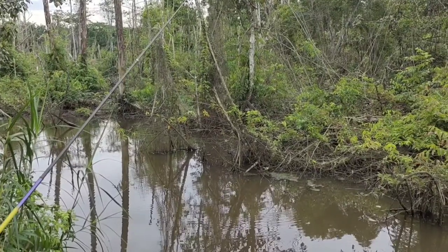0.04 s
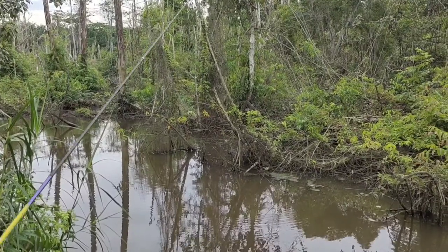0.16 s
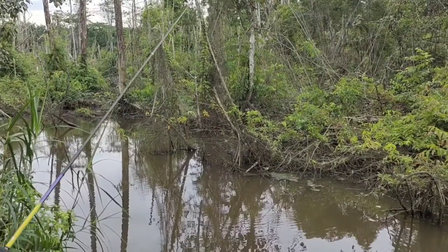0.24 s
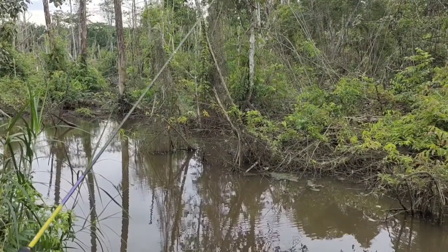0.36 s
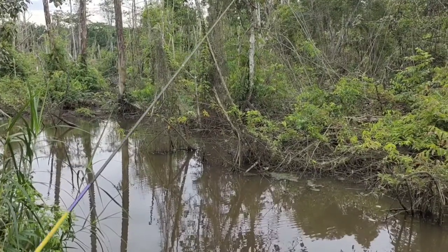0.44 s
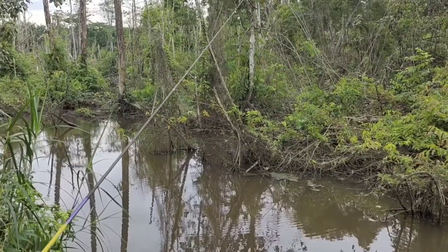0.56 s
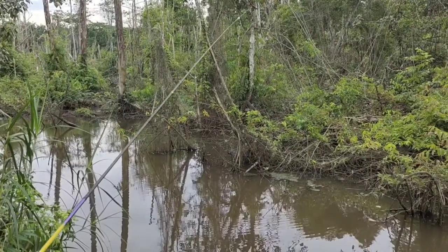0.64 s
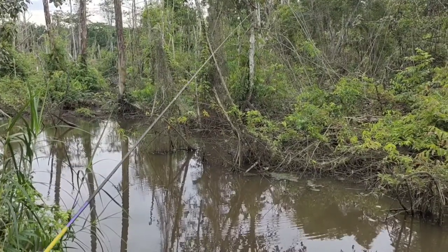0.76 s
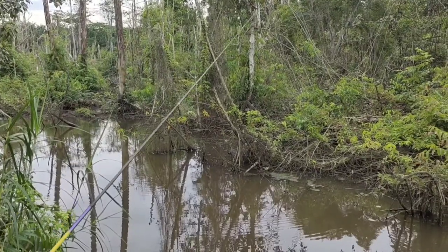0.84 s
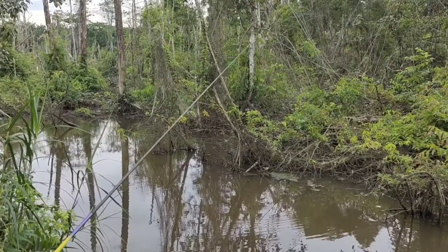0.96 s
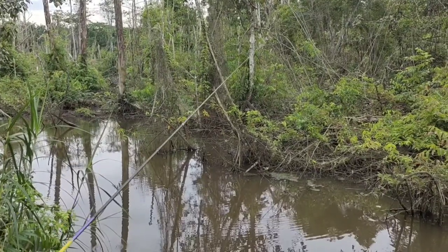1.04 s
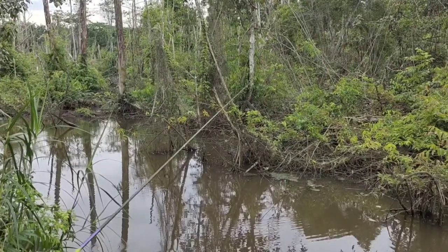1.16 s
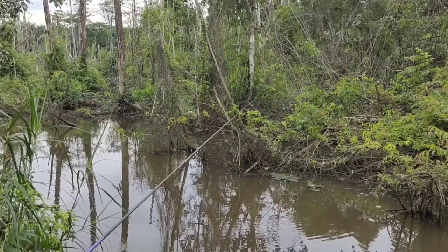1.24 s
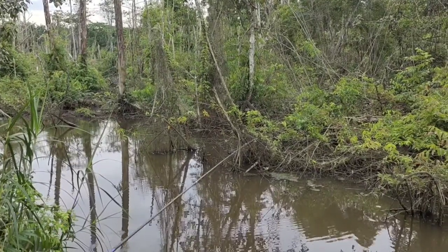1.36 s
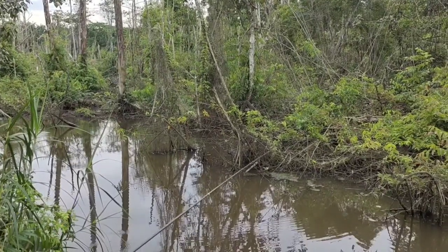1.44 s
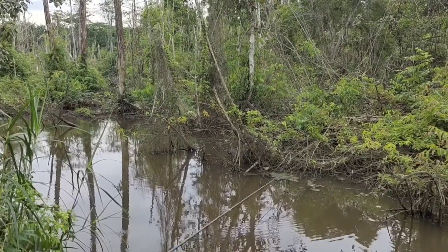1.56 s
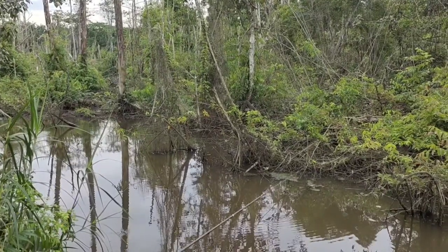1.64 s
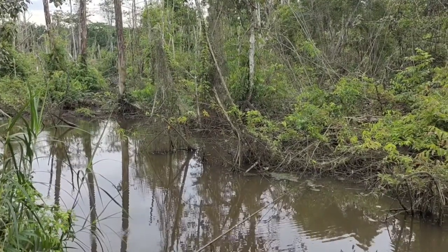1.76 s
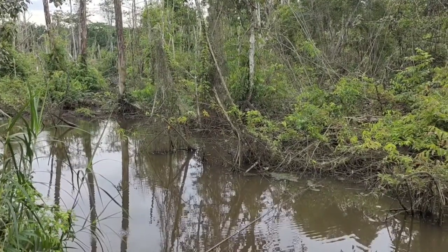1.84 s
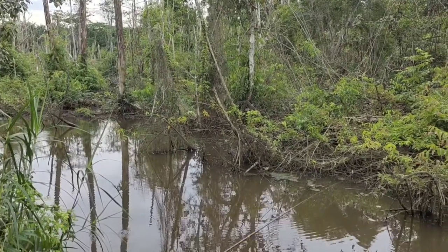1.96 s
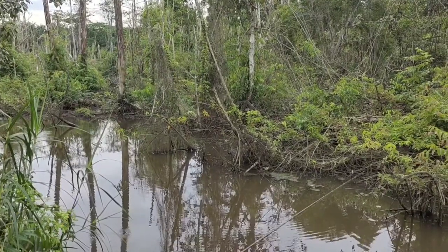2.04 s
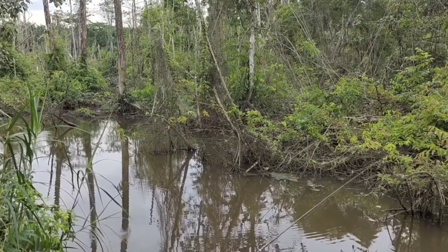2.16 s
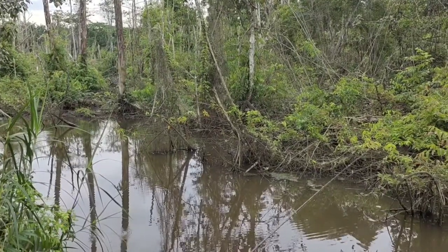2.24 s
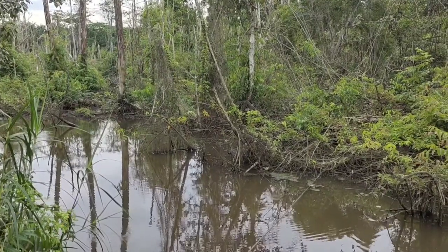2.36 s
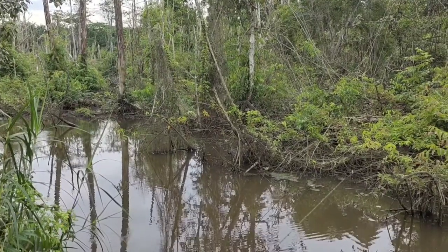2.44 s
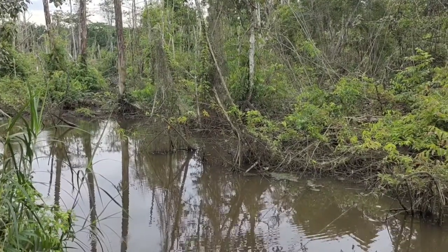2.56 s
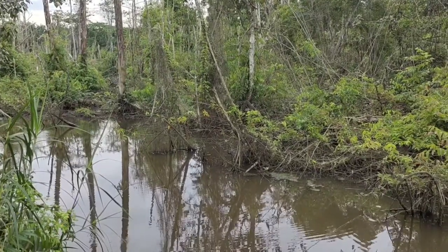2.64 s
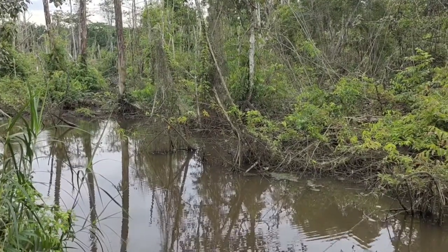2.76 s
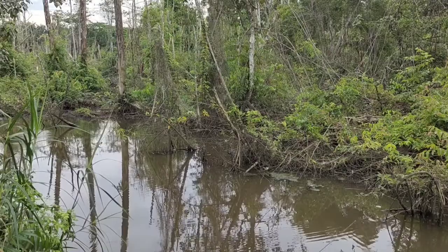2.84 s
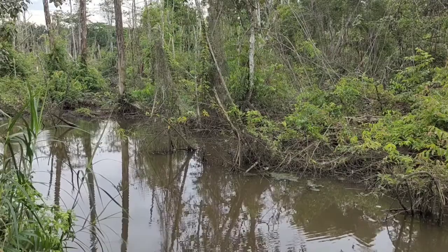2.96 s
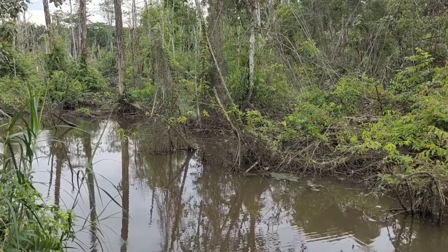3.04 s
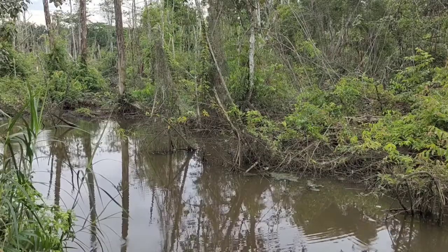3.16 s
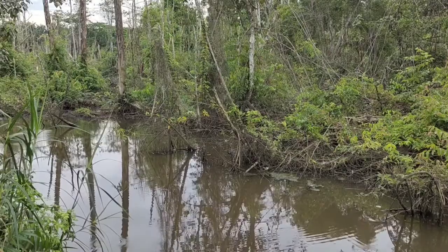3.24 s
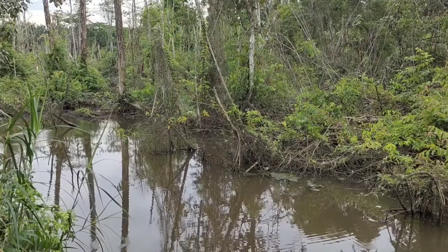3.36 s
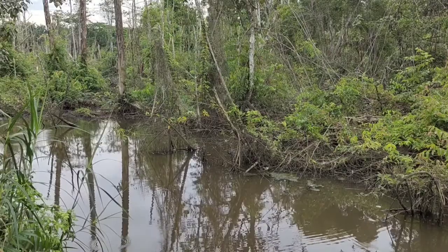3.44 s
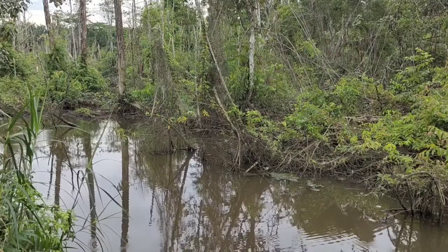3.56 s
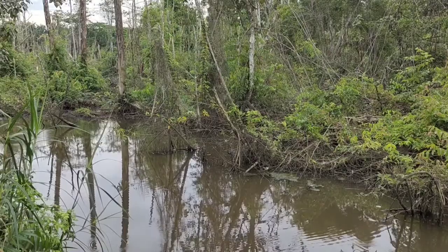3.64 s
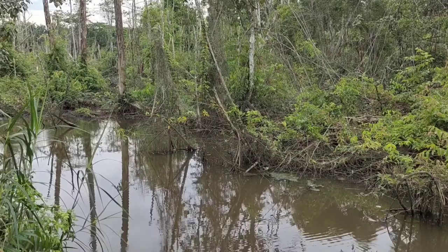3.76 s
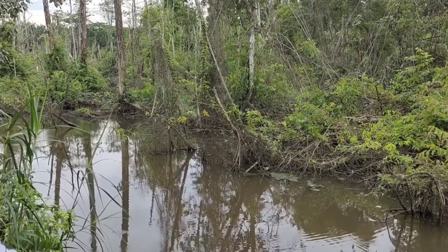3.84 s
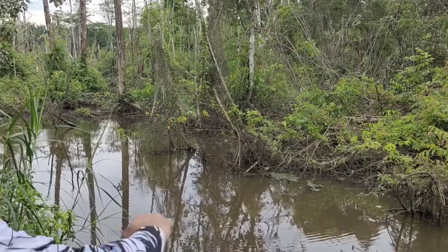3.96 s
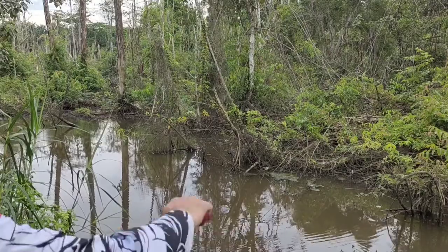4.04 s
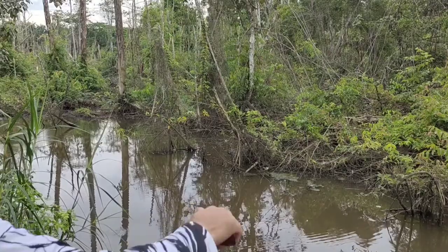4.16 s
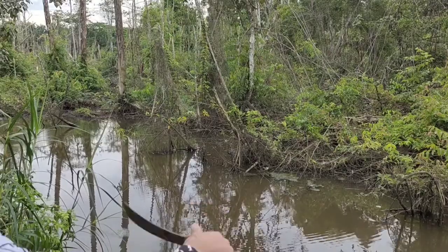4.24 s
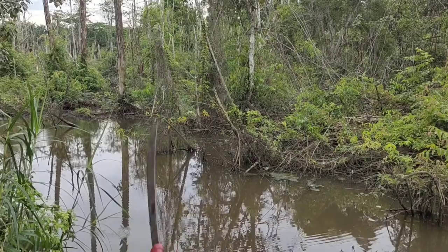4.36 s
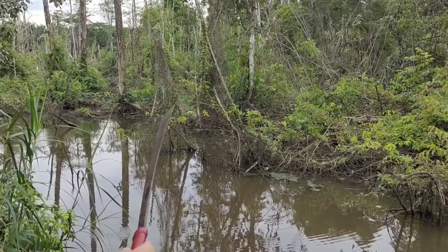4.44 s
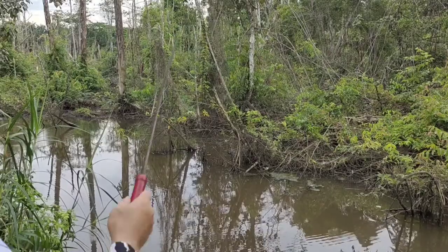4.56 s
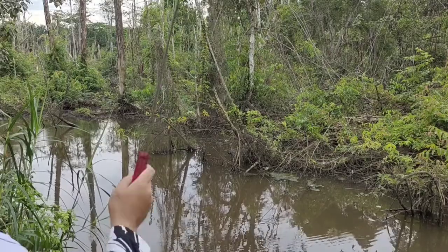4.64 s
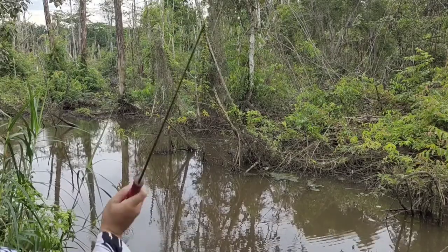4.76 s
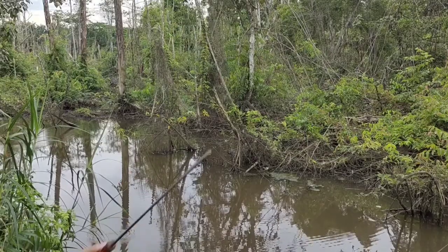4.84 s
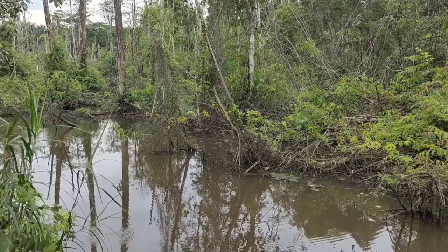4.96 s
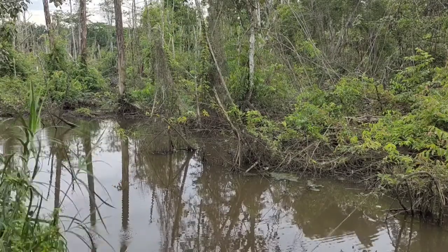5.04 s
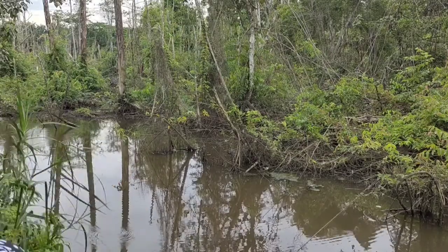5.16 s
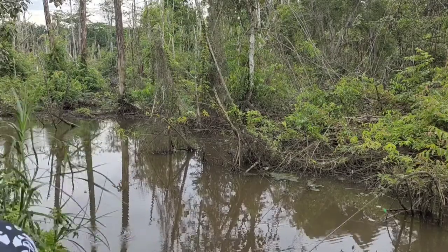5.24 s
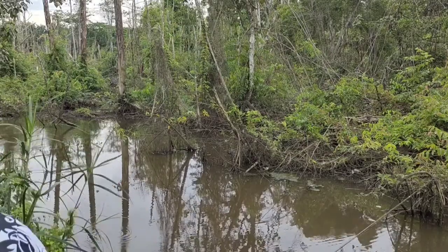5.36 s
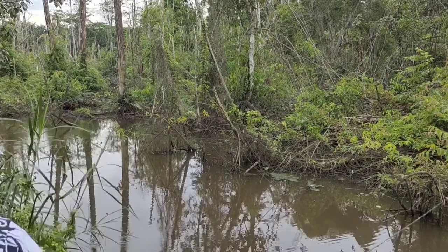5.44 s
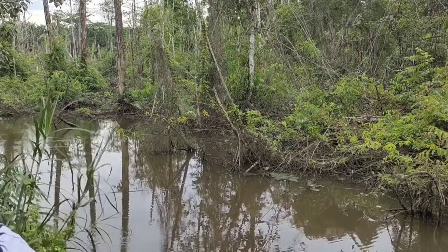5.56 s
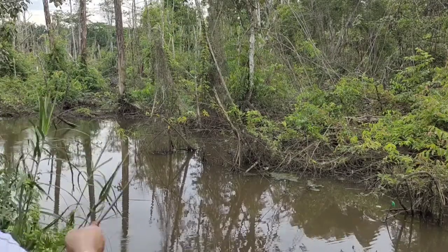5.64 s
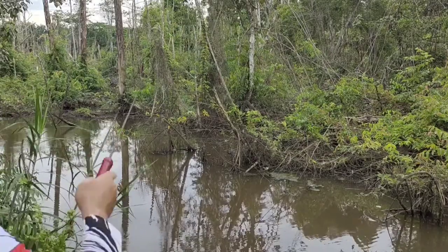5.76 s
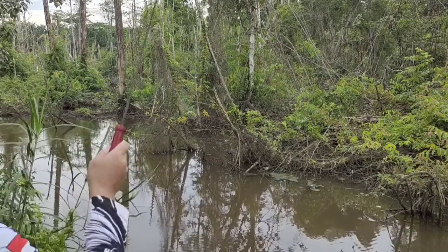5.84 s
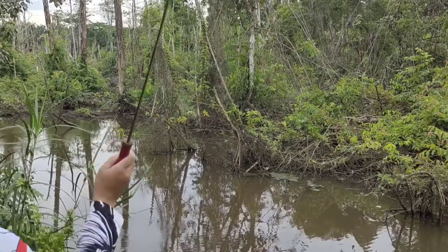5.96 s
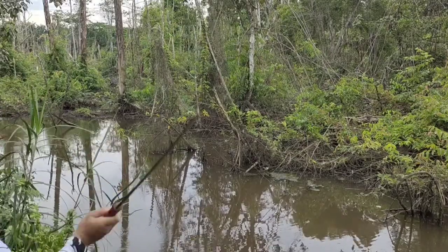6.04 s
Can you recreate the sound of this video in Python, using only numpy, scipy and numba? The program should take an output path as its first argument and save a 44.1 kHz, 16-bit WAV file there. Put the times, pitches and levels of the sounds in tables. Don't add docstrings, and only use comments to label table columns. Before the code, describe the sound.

Daytime swamp insects shrill thinly while clothes and reeds rustle close by; a blade suddenly rips through leaves with a sharp crack, then one hard knock.

```python
import sys
import numpy as np
from scipy import signal
from scipy.fft import rfft, irfft
from scipy.io import wavfile
from scipy.ndimage import uniform_filter1d
from numba import njit

SR = 44100
rng = np.random.default_rng(int(sys.argv[2]) if len(sys.argv) > 2 else 0)


def master_out(mix):
    frames = np.transpose(np.atleast_2d(mix))
    ceiling = np.clip(frames, -1, 1)
    pcm = np.round(ceiling * 32767).astype(np.int16)
    wavfile.write(sys.argv[1], SR, pcm)


def ratio(d):
    e = np.asarray(d, float) / 20
    return 10 ** e


N = 268833
T = np.arange(N) / SR
PORT_LAG = 16.0
BLOCK = 4096


def curve(table):
    s, *columns = np.transpose(table)
    return [np.interp(T, s, column) for column in columns]


def unit(x):
    return x / np.sqrt(np.mean(x ** 2))


@njit
def svf(x, hz, width):
    y, b, l = np.empty(len(x)), 0., 0.
    g, k = np.tan(np.pi * hz / SR), width / hz
    for i in range(len(x)):
        v = (b + g * (x[i] - l)) / (1 + g * (g + k))
        b, l, y[i] = 2 * v - b, l + 2 * g * v, k * v
    return y


def band(x, hz, width):
    return np.array([svf(channel + 1e-18, 1. * hz, 1. * width) for channel in x])


def colour(x, table, size=2048):
    hz, db = np.transpose(table)
    bins_hz = np.arange(size // 2 + 1) * SR / size
    log_gain = np.interp(np.log(bins_hz + 1), np.log(hz), db) * np.log(10) / 20
    cepstrum = irfft(log_gain)
    cepstrum[1:size // 2] *= 2
    cepstrum[size // 2 + 1:] = 0
    impulse = irfft(np.exp(rfft(cepstrum)))
    return signal.oaconvolve(x, impulse[None], axes=1)[:, :N]


def walk(rate):
    step = 32
    k = max(int(SR / step / rate), 1)
    held = np.repeat(rng.standard_normal(N // step // k + 2), k)
    slewed = uniform_filter1d(uniform_filter1d(held, k), k)
    return 1.3 * np.interp(T, np.arange(len(slewed)) * step / SR, slewed)


def ports(x, lag, pan_db):
    return np.array([np.roll(x, int(lag)), x]) * ratio(np.array([[pan_db], [-pan_db]]) / 2)


def grains(count, spread_db, lag=0, scatter=PORT_LAG):
    when, angle, odds, sign = rng.random((count, 4)).T
    size = ratio(-spread_db * np.log(1.002 - odds)) * np.sign(sign - .5)
    left = (when * N).astype(int)
    delay = np.rint(scatter * np.sin(2 * np.pi * angle) - lag).astype(int)
    right = np.clip(left + delay, 0, N - 1)
    return unit(np.array([np.bincount(left, size, N), np.bincount(right, size, N)]))


def air():
    # frequency in Hz, level in dB per Hz.
    air_spectrum = [(30, -0.5), (55, -12.5), (75, -0.5), (125, 3.5), (200, -4), (260, -10), (420, -11.5),
                    (1200, -21), (2200, -19.5), (3500, -20), (5500, -19), (10500, -22.5), (14500, -21),
                    (16000, -24)]
    wash = colour(grains(count=250000, spread_db=0.0), air_spectrum)
    total = 0
    for hz in 60. * 2 ** np.arange(9):
        swell_db = 1.2 * walk(1.5) + .8 * walk(9)
        total = total + ratio(swell_db) * band(wash, hz, .7 * hz)
    return unit(total) * ratio(-58)


def motor():
    # time in seconds, firing rate in Hz, level in dB.
    engine_course = [(0.0, 76.5, -64), (0.42, 76.5, -58.5), (0.98, 85.4, -61), (1.25, 87.6, -68),
                     (1.55, 90.7, -65), (1.87, 82.4, -67.5), (2.41, 74.9, -61), (2.75, 67.2, -77),
                     (3.15, 67.4, -62), (3.6, 67.3, -74), (4.0, 67.8, -65), (4.5, 68, -73), (6.1, 69, -72)]
    # frequency in Hz, level in dB.
    hum_tones = [
        (191, -68.5),
        (127.6, -72),
    ]
    hz, db = curve(engine_course)
    turn = 2 * np.pi * np.cumsum(hz) / SR
    engine = ratio(db + 3.0 + 1.0 * walk(5.5)) * (np.sin(turn) + ratio(-21) * np.sin(2 * turn))
    hum = sum(ratio(hum_db + 1.5 + 3.0 * walk(6)) * np.sin(2 * np.pi * hum_hz * T)
              for hum_hz, hum_db in hum_tones)
    return np.array([engine + hum] * 2)


def singers(table, jitter, throb_db, pan_db):
    out = 0
    for hz, width, rate, db, lag in table:
        phase = np.cumsum(rate * (1 + jitter * walk(60))) / SR
        strokes = np.diff(np.floor(phase), prepend=0) * ratio(3.14 * walk(150) + throb_db * walk(12))
        wing = svf(svf(strokes, 1. * hz, 1. * width), 1. * hz, 2. * width)
        out = out + ratio(db) * ports(unit(wing), lag, pan_db)
    return unit(out)


def insects():
    # time in seconds, chorus level in dB, katydid level in dB against the crickets.
    chorus_course = [(0.0, -57.5, -12), (0.19, -56, -20), (0.63, -57, -20), (1.36, -57, -14.5),
                     (1.92, -57.5, -17.5), (2.88, -57, -13), (4.35, -57, -10.5), (4.82, -56.5, -12),
                     (4.94, -58.5, -10), (5.36, -58, -20), (5.72, -56, -22), (6.1, -57, -24)]
    # wing mode in Hz, its width in Hz, strokes per second, level in dB, lag in samples.
    cricket_wings = [(7285, 72, 200, 1.5, -10), (7220, 150, 120, -2.5, -17), (7420, 63, 81, 1, -5),
                     (7560, 120, 130, -9, -11), (7620, 110, 370, -2.5, 7), (7034, 150, 173, -8, 14),
                     (7790, 870, 190, -5.5, -10.5), (6670, 340, 140, -7, 5)]
    # wing mode in Hz, its width in Hz, strokes per second, level in dB, lag in samples.
    katydid_wings = [(9270, 480, 110, 20, -16.5), (9040, 490, 76, -2.5, -10), (9000, 290, 130, -23, 4),
                     (9100, 590, 255, -6, -1.5), (9370, 490, 550, 3, 4.5)]
    chorus_db, katydid_db = curve(chorus_course)
    crickets = singers(cricket_wings, jitter=0.22, throb_db=0.0, pan_db=5.0)
    katydids = singers(katydid_wings, jitter=.03, throb_db=1.5, pan_db=4.0)
    return ratio(chorus_db + 5.0) * (crickets + ratio(katydid_db) * katydids)


def notes():
    # start in seconds, peak in dB, pitch in Hz, length in seconds, glide share.
    hoarse_notes = [(0.829, -61, 2050, .12, -0.0031), (1.346, -59, 2310, .1, -0.096),
                    (1.614, -55.5, 2104, .094, 0.049), (1.91, -58, 2116, 0.058, 0.029),
                    (2.112, -56, 2123, 0.067, 0.05), (3.109, -57, 2320, 0.022, -0.0015),
                    (3.237, -56, 2270, 0.014, 0.0022), (3.43, -58, 2220, 0.041, -0.038),
                    (3.482, -58, 2114, .15, 0.0065), (3.616, -55, 2096, .15, -0.074),
                    (3.764, -54.5, 2050, 0.11, 0.074), (3.905, -59, 2133, 0.12, -0.029),
                    (4.283, -60.5, 2280, 0.0099, 0.011)]
    # start in seconds, peak in dB, pitch in Hz, length in seconds.
    chip_notes = [
        (0.903, -53, 3850, 0.049),
        (1.131, -58, 4080, .016),
        (1.544, -61, 3960, .034),
        (3.625, -45, 3990, 0.015),
        (3.705, -48.5, 3300, 0.022),
        (3.783, -49, 4090, 0.028),
        (3.942, -43, 3940, 0.011),
    ]
    # start in seconds, peak in dB, length in seconds.
    peep_notes = [
        [(.734, -60, 0.028), (1.917, -63, 0.018), (2.113, -61, 0.013), (2.863, -61, 0.02), (3.096, -61, 0.014)],
        [(.551, -50.5, 0.016), (.745, -57, .1), (.984, -54, 0.021), (1.326, -62, 0.11), (1.615, -58.5, 0.09),
         (1.912, -62, 0.063), (2.114, -56.5, 0.025), (2.853, -59, 0.016), (3.263, -58, 0.013)],
        [(.761, -65, .04), (.8237, -58.5, 0.023), (1.157, -71, .018), (1.33, -66.5, 0.16), (1.941, -69, 0.032),
         (3.268, -65, 0.018)],
    ]
    # start in seconds, peak in dB, length in seconds.
    whistle_notes = [
        (.536, -60, .03),
        (0.984, -55, 0.036),
        (6.038, -49, 0.022),
    ]
    squeak_levels = [-66.5, -55.5, -90, -56, -90, -58]
    rows = [row + (158,) for row in hoarse_notes]
    rows += [row + (0, 140) for row in chip_notes]
    for hz, table in zip((3400, 4397, 5366), peep_notes):
        rows += [(s, db, hz, length, 0, 65) for s, db, length in table]
    rows += [(s, db, 8635, length, 0, 80) for s, db, length in whistle_notes]
    rows += [(2.925, db, k * 1920, .065, .08, k * 60) for k, db in enumerate(squeak_levels, 1)]
    return rows


def birds():
    out = np.zeros(N)
    for s, db, hz, length, glide, rasp_hz in notes():
        t = np.arange(int(np.clip(length, .008, .18) * SR)) / SR
        k = max(int(SR / max(rasp_hz, 5) / 2.5), 1)
        tremor = rng.standard_normal((2, 2 * BLOCK))
        tremor = uniform_filter1d(uniform_filter1d(tremor, k, axis=1), k, axis=1)
        re, im = unit(tremor)[:, :len(t)]
        turn = 2 * np.pi * hz * (t + glide * t ** 2 / t[-1] / 2)
        throb = 1 + 0.11 * np.sin(2 * np.pi * 95 * t)
        shape = throb * np.minimum(t / 0.0021, 1) * np.clip((t[-1] - t) / (0.16 * t[-1]), 0, 1)
        note = ratio(db) * shape * ((.5 + re) * np.sin(turn) + im * np.cos(turn))
        start = int(s * SR)
        out[start:start + len(t)] += note[:N - start]
    echo = rng.standard_normal((2, 8000)) * ratio(-60 * np.arange(8000) / SR / .2)
    return ports(out, -17.0, 5.3) + ratio(-32) * signal.oaconvolve(out[None], echo, axes=1)[:, :N]


def drip():
    start_s, peak_db, t60_s = 3.123, -44, .07
    start_hz, glide_hz_s = 1230, 2500
    t = np.maximum(T - start_s, 0)
    tone = np.sin(2 * np.pi * (start_hz + glide_hz_s * t / 2) * t)
    return ports(np.minimum(t / .002, 1) * ratio(peak_db - 60 * t / t60_s) * tone, -3, 1.6)


def ticks():
    # start in seconds, knock peak in dB, body pitch in Hz, crack level in dB.
    impacts = [(.0735, -28.5, 403, -30.5), (0.0723, -26, 1040, -72), (.255, -45, 715, -58),
               (0.317, -48, 1210, -54), (0.528, -44, 900, -50), (.65, -56, 250, -60), (1.25, -68, 260, -52),
               (1.748, -44, 232, -65), (1.769, -46.5, 830, -65), (1.7811, -38.5, 327, -65),
               (1.791, -43, 797, -42.5), (2.135, -70, 900, -56), (2.5252, -42, 2006, -42),
               (2.584, -48, 1385, -56), (2.854, -49, 706, -66), (3.388, -62, 374, -59),
               (3.487, -44.5, 716, -66), (3.581, -36, 573, -59), (4.029, -55, 1200, -72),
               (4.6165, -30, 864, -34.5), (4.6165, -27.5, 1300, -76), (4.77, -56, 282, -49),
               (4.792, -43, 827, -48), (4.807, -47, 533, -59), (5.828, -21, 1540, -25),
               (5.8284, -18, 2220, -60), (5.8281, -22.5, 800, -60), (5.841, -36, 1200, -55),
               (5.965, -40, 520, -48), (5.991, -40, 1170, -49)]
    contact_s, ring_cycles = 0.001, 6.7
    out = np.zeros((2, N + BLOCK))
    t = np.arange(BLOCK) / SR
    rise = np.minimum(t / contact_s, 1)
    for s, db, hz, crack_db in impacts:
        noise = rng.standard_normal((4, BLOCK))
        knock_db = db - 60 * np.maximum(t - contact_s, 0) * hz / ring_cycles
        knock = ratio(knock_db) * np.sin(2 * np.pi * hz * t)
        snap_db = -7 + db + 0.24 * (crack_db - db)
        snap = ratio(snap_db - 60 * t / 0.06) * svf(noise[0], 1550.0, 4500.0)
        bright = svf(svf(noise[1], 11100.0, 9000.0), 9000.0, 12000.0)
        crack = ratio(crack_db + 15.5 - 60 * t / .008) * bright
        scatter = ratio(crack_db + 1 - 60 * t / 0.042) * band(noise[2:], 9500.0, 9000.0)
        start = int((s + 0.0022) * SR)
        out[:, start:start + BLOCK] += ports(rise * (knock + snap) + crack, 3, 0.44) + rise * scatter
    return out[:, :N]


def moves():
    # start in seconds, length in seconds, leaves in dB, reeds and cloth in dB against the leaves.
    move_rows = [(.0, 0.15, -54.5, -15, -2), (0.047, 0.18, -54, -9, -7), (0.23, 0.15, -57.5, -7.5, -6.5),
                 (.36, 0.36, -65.5, -10, -3), (0.648, 0.014, -67, -2, 7.5), (.97, 0.16, -64, -5.5, 1),
                 (1.198, 0.2, -67.5, -7, -4), (2.352, 0.019, -77, -8, 15), (3.301, 0.038, -72.5, 1, 9.5),
                 (3.49, 0.22, -56, -2, -7), (3.633, .09, -66, -3, 12), (3.67, .24, -63.5, 10, -2),
                 (3.837, 0.037, -67, 9, 7), (3.881, 0.023, -68, -8, 12), (4.504, .03, -69, -10, -8),
                 (4.62, .09, -60.5, -8, -11), (4.775, 0.06, -59, -11, -2.5), (4.805, 0.15, -67.5, -5, 3),
                 (5.166, 0.46, -58.5, -2, 1), (5.549, 0.17, -56.5, -3.5, 3), (5.67, 0.23, -63, -0.5, 1),
                 (5.817, 0.1, -51.5, -6, -5), (5.943, 0.13, -63.5, -3, 6.5)]
    attack, hold, edge_db = 0.17, 0.37, 9.5
    power = np.full((3, N), ratio(2 * -75))
    for s, length, db, reeds_db, cloth_db in move_rows:
        x = (T - s) / max(length, .01)
        before = 1 - x / attack
        after = (x - attack - hold) / (1 - attack - hold)
        away = np.maximum(np.maximum(before, after), 0)
        power += ratio(2 * (db - edge_db * away)) * ratio(2 * np.array([[0], [reeds_db], [cloth_db]]))
    return np.sqrt(power)


def rustle():
    # resonance in Hz, its width in Hz, level in dB.
    fold_modes = [
        [(435, 180, -6), (770, 430, -3.5), (1300, 970, 2)],
        [(1800, 980, -1), (2660, 510, 6), (3300, 210, 7), (3700, 180, -2.5), (4830, 16000, -3.5)],
        [(8600, 700, 21), (9800, 18000, -6), (14100, 16000, 5)],
    ]
    slips = grains(count=70000, spread_db=2.5, lag=14, scatter=6)
    layers = []
    for folds, patch_db in zip(fold_modes, (3.5, 3.8, 1.3)):
        rung = sum(ratio(db + patch_db * walk(30)) * band(slips, hz, width) for hz, width, db in folds)
        layers.append(unit(rung))
    bass, middle, treble = layers
    leaves, reeds, cloth = moves()
    return ratio(3.5) * leaves * treble + ratio(7.5) * reeds * middle + ratio(5.5) * cloth * bass


def blade():
    attack_s, hold_s = 0.015, 0.024
    t = np.maximum(T - 4.9085, 0)
    after = np.maximum(t - attack_s - hold_s, 0)
    bite = ratio(-23.5) * np.minimum(t / 0.00038, 1) * (t < .0055)
    fall = ratio(-24 - 238 * after) + ratio(-37 - 43 * after)
    gain = np.maximum(bite, np.minimum(t / attack_s, 1) * fall)
    bass_db = -3 - 13 * np.exp(-t / 0.015)
    return gain, bass_db


def slash():
    # frequency in Hz, level in dB per Hz.
    leaf_spectrum = [(29, -51), (50, -17.5), (337, -10), (408, -5), (520, -6.5), (694, -7), (927, -7.5),
                     (1540, -5.5), (2010, -2), (2160, -3), (4900, -8.5), (7950, -4.5), (11400, -10),
                     (14900, -10.5), (16000, -9.5)]
    # frequency in Hz, width in Hz, level in dB.
    stalk_modes = [(176, 45, -3), (249, 22, -1), (343, 26, 2.5), (510, 46, -3.5), (937, 64, -9),
                   (2070, 51, -16), (2390, 49, -17), (2660, 71, -4)]
    gain, bass_db = blade()
    cracks = grains(count=150000, spread_db=1.1, lag=8, scatter=6) * gain * ratio(3.5 + 0.56 * walk(300))
    torn = colour(cracks, leaf_spectrum)
    torn = torn * np.sqrt(np.sum(cracks ** 2) / np.sum(torn ** 2))
    thud = band(band(torn, 390, 760), 370, 970) * (ratio(bass_db + 5.5) - 1)
    ring = sum(ratio(db) * band(cracks, hz, width) for hz, width, db in stalk_modes)
    return torn + thud + ratio(1.5 + 2.0 * walk(60)) * ring


def scene():
    return air() + motor() + insects() + birds() + drip() + ticks() + rustle() + slash()


def band_limit(x):
    return signal.sosfilt(signal.butter(12, 16790, fs=SR, output="sos"), x)


def record(dry):
    # frequency in Hz, left minus right level in dB.
    port_shade = [(300, -.3), (1290, -.5), (2380, .7), (4400, 1.5), (8120, -2.5), (11000, 2.5),
                  (15000, 4.5)]
    shaded = np.vstack([colour(dry[[k]], np.array(port_shade) * [1, side], size=256)
                        for k, side in enumerate((.5, -.5))])
    bass_cut = signal.butter(3, 62, "highpass", fs=SR, output="sos")
    top_cut = signal.ellip(8, .2, 32, 15600, fs=SR, output="sos")
    heard = signal.sosfilt(top_cut, signal.sosfilt(bass_cut, shaded))
    return band_limit(heard)


dry = scene()
out = record(dry)
master_out(out)
```